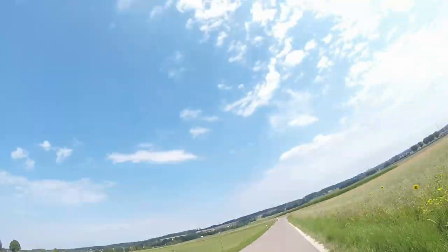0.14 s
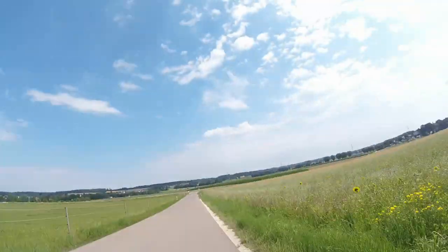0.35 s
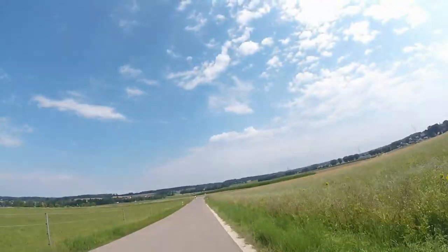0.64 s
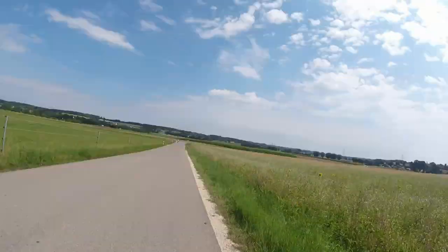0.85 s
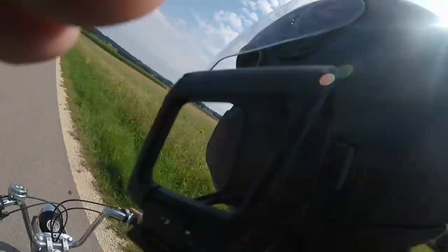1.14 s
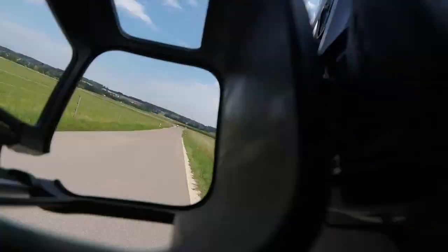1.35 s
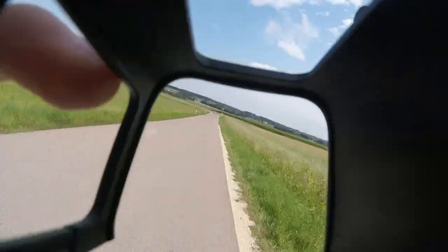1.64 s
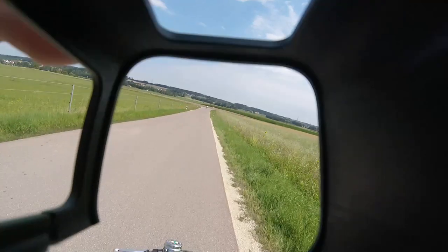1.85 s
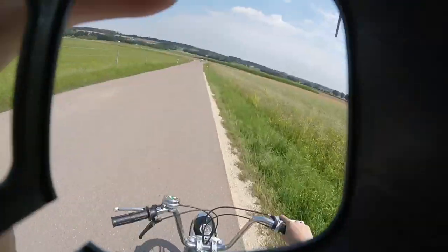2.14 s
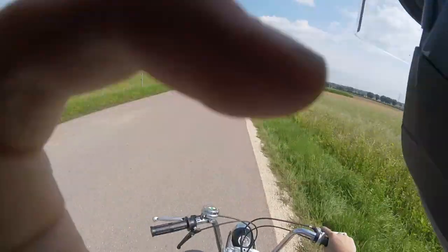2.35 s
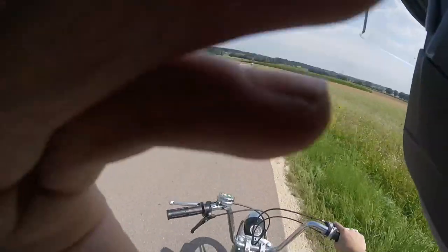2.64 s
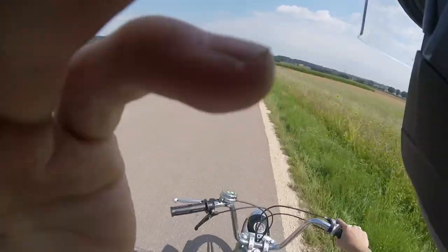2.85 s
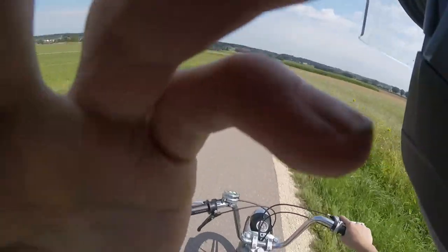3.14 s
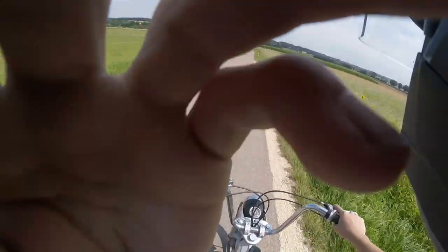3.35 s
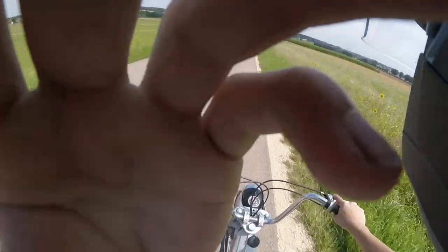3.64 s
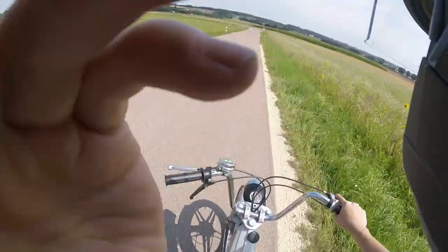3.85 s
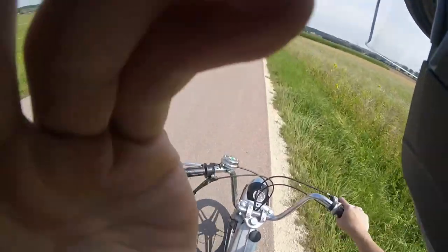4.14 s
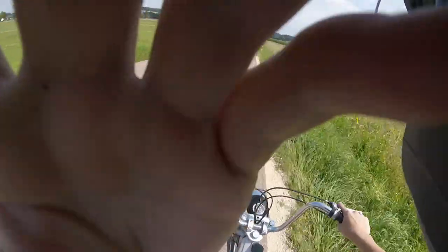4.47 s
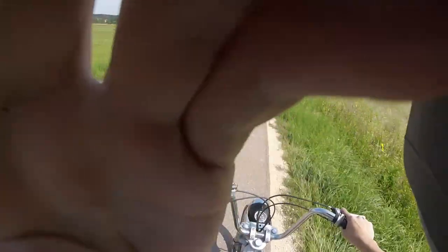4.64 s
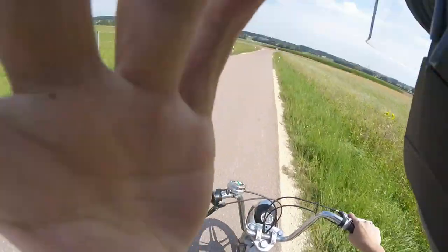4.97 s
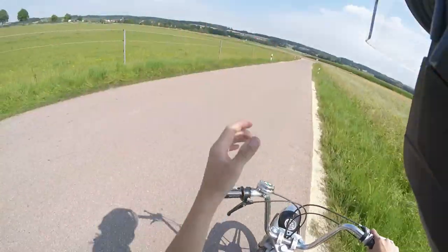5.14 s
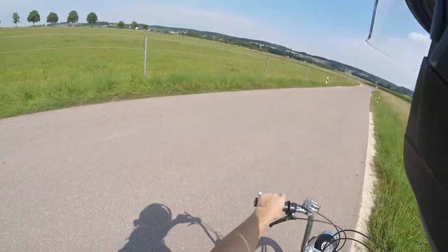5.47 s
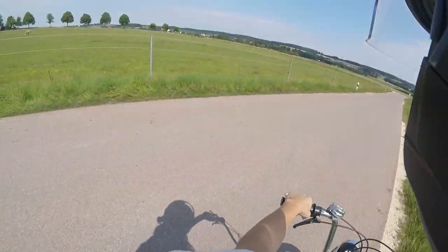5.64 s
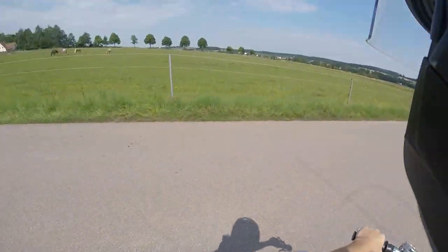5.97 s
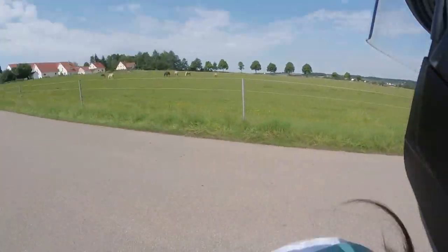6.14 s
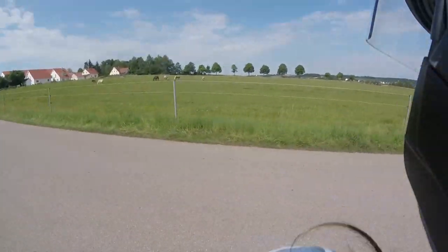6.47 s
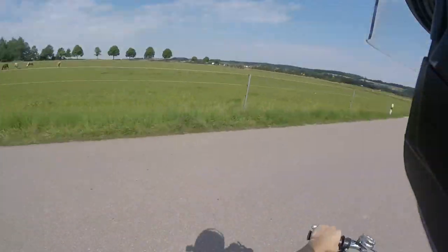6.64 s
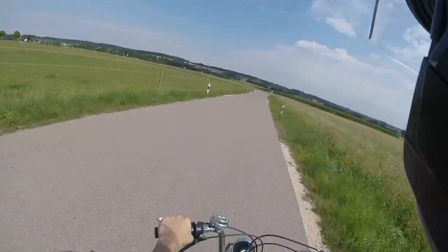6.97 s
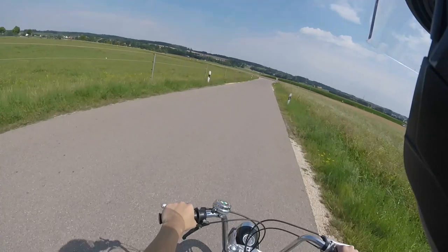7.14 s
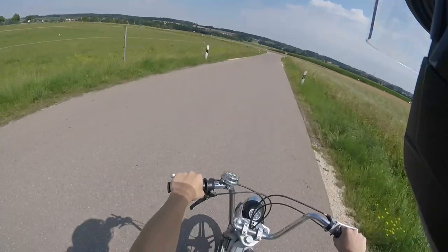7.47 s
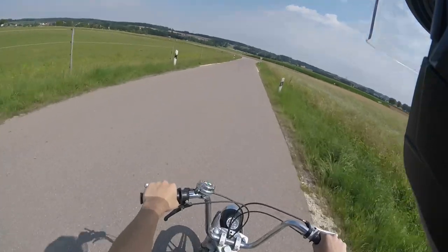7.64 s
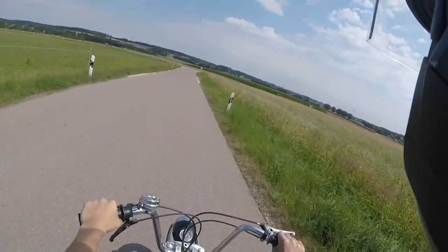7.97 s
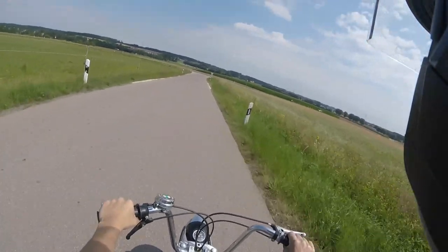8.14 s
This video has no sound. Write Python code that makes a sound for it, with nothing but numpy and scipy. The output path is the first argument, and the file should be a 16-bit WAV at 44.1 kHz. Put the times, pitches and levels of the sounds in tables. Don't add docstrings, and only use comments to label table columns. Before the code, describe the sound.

Outdoors, a small two-stroke moped runs throughout, close to a helmet-mounted microphone: rapid purring pops, hollow intake and silencer resonance, dry metallic fin rattle and light tyre hiss. At 0-1 s it sounds open and steady, with a soft thump at 0.1. From 1.0 s it becomes more muffled as fingers handle the plastic casing: a rub, a longer scrape at 1.3-1.6, small latch clicks at 1.4 and 1.5, and a hard knock at 1.73. A squeaky rub at 2.2 leads to a heavy thud at 2.43. Engine pitch sinks gradually until 4.8, under low, lumpy wind gusts. The loudest snap hits at 4.77; engine and wind dip just before each big knock and swell back. Wind buffets strongly around 5.7-6 and 6.8. Revs rise from 5.1, the rattle thinning around 6-6.7, then accelerate sharply after 7.7, louder and brighter, until the abrupt end at 8.3.

```python
import sys
import numpy as np
from scipy import signal
from scipy.fft import rfft, irfft, next_fast_len
from scipy.io import wavfile
from scipy.ndimage import map_coordinates

SR = 44100
rng = np.random.default_rng(int(sys.argv[2]) if len(sys.argv) > 2 else 0)


def unload_wav(signal):
    wavfile.write(
        sys.argv[1],
        SR,
        np.round(np.clip(np.atleast_2d(signal).T, -1, 1) * 32767).astype(np.int16),
    )


def to_linear_factor(level_db):
    exponent = np.asarray(level_db, float) / 20
    return 10 ** exponent


N = 366471
T = np.arange(N) / SR

# t/s, echo delay/s, echo level/dB, shading/0-1
ROAD = [(0, 0.0022, -2, 0.36), (.95, 0.0023, -1.5, 0.3), (1.1, 0.002, -22, 1), (2.6, 0.0023, -35, 0.84),
        (4.7, 0.0015, -18, 1), (5, 0.0017, -14, 1), (6.7, 0.00161, -11, 1), (7.1, 0.0019, -12, 0.7),
        (7.7, 0.0025, -4.5, 0.93), (8.31, 0.0022, -8.5, 0.63)]


def unit(x):
    return x / np.sqrt(np.mean(x ** 2) + 1e-20)


def along(points, hz):
    f, v = np.transpose(points)
    return np.interp(np.log(hz + 1), np.log(f + 1), v)


def curves(rows):
    s, *columns = np.transpose(rows)
    return [np.interp(T, s, column) for column in columns]


def wobble(rate):
    knots = rng.standard_normal(int(N * rate / SR) + 4)
    return map_coordinates(knots, [T * rate])


def filtered(x, response):
    m = next_fast_len(N + SR // 2)
    spectrum = rfft(x, m) * response(np.fft.rfftfreq(m, 1 / SR))
    return irfft(spectrum, m)[:N]


def hiss(spectrum):
    return unit(filtered(rng.standard_normal(N), lambda hz: to_linear_factor(along(spectrum, hz))))


def resonant(modes, flip=-1):
    def response(f):
        total = 0
        for k, (centre, width, db) in enumerate(modes):
            bandwidth = 1j * f * width
            total = total + flip ** k * to_linear_factor(db) * bandwidth / (centre * centre - f * f + bandwidth)
        return total
    return response


def pulses(turns, scatter_db, jitter, late=0, gain=1):
    whole = np.arange(1, int(turns[-1]) + 1)
    chance = rng.standard_normal((len(whole), 2))
    at = np.interp(whole + jitter * chance[:, 0], turns, np.arange(N) + late * SR).clip(0, N - 1)
    k = at.astype(int)
    size = to_linear_factor(scatter_db * chance[:, 1]) * (gain * np.ones(N))[k]
    before = np.bincount(k, size * (k + 1 - at), N + 1)
    after = np.bincount(k + 1, size * (at - k), N + 1)
    return (before + after)[:N]


def exhaust(turns):
    # f/Hz, width/Hz, level/dB
    pop_open = [(1227, 370, 4), (730, 14, 6), (2320, 1100, -25), (215, 150, 4.5)]
    # f/Hz, width/Hz, level/dB
    pop_shaded = [(1052, 164, 2.5), (728, 95, -0.5), (2340, 530, -12), (202, 420, -11)]
    delay, echo_db, shade = curves(ROAD)
    direct = pulses(turns, scatter_db=0.9, jitter=0.00024)
    echo = pulses(turns, scatter_db=3.5, jitter=0.00066, late=delay, gain=to_linear_factor(echo_db))
    blasts = direct + echo

    def path(modes, top_hz):
        return unit(filtered(blasts, lambda f: resonant(modes, flip=1)(f) / (1 + 1j * f / top_hz) ** 3))

    shade = shade.clip(0, 1)
    return -(1 - shade) * path(pop_open, top_hz=4080) - shade * path(pop_shaded, top_hz=2090)


def chamber(turns, modes):
    puffs = pulses(turns, scatter_db=0.8, jitter=0.0022)
    return unit(filtered(puffs, lambda f: np.conj(resonant(modes, flip=1)(f)) ** 2))


def intake_and_silencer(speed, turns, throttle_db):
    # f/Hz, width/Hz, level/dB
    off_pipe = [(467, 126, 5), (517, 84, -1.5), (680, 130, -12), (802, 78, -10.5), (1532, 140, -2),
                (1980, 170, -6)]
    # f/Hz, width/Hz, level/dB
    on_pipe = [(443, 113, 4), (508, 97, -3.5), (740, 59, -15.5), (1200, 100, -5), (1570, 150, -6),
               (2040, 110, -11)]
    # f/Hz, width/Hz, level/dB
    intake = [(377.4, 74, 0)]
    # t/s, level/dB
    airbox = [(0, -9), (.5, 4), (1, 5), (2.5, 1), (2.9, 4), (3.5, -2), (3.95, -9.5), (4.25, -3), (4.6, 6.5),
              (5.3, 1.5), (5.85, -1.5), (6.2, -22), (7.3, -24), (7.5, 4.5), (7.72, 3.5), (7.8, -1),
              (7.88, -8), (8.2, -4)]
    pipe_from, pipe_span = 78.5, 2.5
    port_turns = turns + 0.12
    tuned = ((speed - pipe_from) / pipe_span).clip(0, 1)
    silencer = (1 - tuned) * chamber(port_turns, off_pipe) + tuned * chamber(port_turns, on_pipe)
    return to_linear_factor(curves(airbox)[0]) * chamber(port_turns, intake) + to_linear_factor(throttle_db - 7.0) * silencer


def shaft_orders(turns):
    # multiple of the shaft rate, level over the pop/dB
    orders = [(1, 4), (2, 3), (3, 0), (4, -6)]
    return sum(to_linear_factor(db + 0.23 * wobble(16)) * np.sin(2 * np.pi * k * turns) for k, db in orders)


def tyres(throttle_db):
    # f/Hz, level/dB per Hz
    tread = [(300, -17), (600, -36), (900, -11), (1570, -12), (2500, -14.5), (4590, -44), (6640, -22),
             (7900, -73)]
    level_db, yield_share = -6.5, 0.39
    return to_linear_factor(level_db - yield_share * throttle_db + 1.16 * wobble(23)) * hiss(tread)


def rattle(turns):
    # t after the firing/s, level/dB, decay/s
    slap_times = [
        (0, -1, .0015),
        (.0042, 1, .002),
        (.0078, -3, .0015),
        (.0115, -9, .0015),
    ]
    # f/Hz, level/dB per Hz
    case = [(700, -3), (1300, 0.5), (2300, -2.5), (3060, 0), (4540, -5), (5400, -2.5), (6000, -5.5),
            (7400, -17)]
    # f/Hz, width/Hz, level/dB
    fins = [(2025, 45, -6), (2887, 14, 1.5), (3197, 25, -6), (3378, 30, -2), (3492, 30, -2), (3621, 35, -3),
            (3749, 35, 1), (3862, 45, -3), (4055, 36, -1), (4330, 40, -8), (4829, 30, -5), (4980, 30, -8),
            (5120, 70, -3), (6450, 130, -5)]
    # f/Hz, width/Hz, level/dB
    barrel_modes = [(3760, 520, 0), (5100, 300, -9), (6450, 220, -14)]
    gate_floor, same_blow = 0.28, 0.14
    fins_db, barrel_db, barrel_hides_db = 6, 0.5, 12.5

    def soften(tau):
        return lambda f: SR / (1 / tau + 2j * np.pi * f) / (1 + 1j * f / 400)

    slaps = [to_linear_factor(db) * pulses(turns, scatter_db=-1.0, jitter=0.0025, late=late) for late, db, _ in slap_times]
    gate = gate_floor + sum(filtered(slap, soften(tau)) for slap, (_, _, tau) in zip(slaps, slap_times))
    struck = unit(gate * rng.standard_normal(N)) + same_blow * unit(sum(slaps))
    body = filtered(struck, lambda f: to_linear_factor(along(case, f)) + to_linear_factor(fins_db) * resonant(fins, flip=1)(f))
    shade = curves(ROAD)[2]
    barrel = to_linear_factor(barrel_db - barrel_hides_db * shade) * filtered(struck, resonant(barrel_modes, flip=0.39))
    return unit(body + barrel)


def engine():
    # t/s, f/Hz
    firing = [(0.0, 62.57), (0.9, 60.85), (1.8, 58.81), (2.7, 56.8), (3.6, 54.09), (4.3, 52.32),
              (4.8, 50.6), (5.1, 51.01), (5.4, 52.19), (6.0, 57.64), (6.3, 59.92), (6.6, 64.15),
              (7.2, 69.95), (7.5, 73.38), (7.7, 76.35), (7.87, 80.22), (8.02, 85.54), (8.31, 94.65)]
    # t/s, exhaust level/dB, throttle/dB, view of the cylinder/dB
    ride = [(0, -33, -1, -1), (.5, -31, 0, 1.5), (.93, -30, 1, 0), (1.06, -34, 0.5, -3),
            (1.66, -33, 11, -2.5), (2.2, -37, 4.5, 1), (2.9, -36, 6.5, 2), (3.8, -32, 7.5, 2.5),
            (4.25, -31, 11.5, 4), (4.7, -31, 4, 7), (5, -33.5, 9, 3.5), (5.4, -34, 7.5, -2),
            (5.85, -30.5, 3, -12), (6.25, -33.5, 9, -11), (6.7, -30, 1.5, -11), (6.9, -31, 11, -2),
            (7.78, -26, 11.5, -1), (7.92, -26.5, 19.5, -1)]
    speed, = curves(firing)
    turns = -0.28 + np.cumsum(speed) / SR
    exhaust_db, throttle_db, view_db = curves(ride)
    mix = to_linear_factor(1.5) * exhaust(turns)
    mix = mix + intake_and_silencer(speed, turns, throttle_db)
    mix = mix + shaft_orders(turns) + tyres(throttle_db)
    mix = mix + to_linear_factor(view_db - 1.2) * rattle(turns)
    return to_linear_factor(exhaust_db) * mix


def wind():
    # t/s, level/dB
    airflow = [(0, -20), (.7, -16), (1.6, -11), (2.4, -25), (4.7, -20.5), (5.3, -19.5), (6.1, -18.5),
               (6.5, -15.5), (7.4, -18.5), (8.31, -21)]
    # peak t/s, strength/dB, half length/s, flutter over its usual share/dB
    gusts = [(0.017, -18.5, 0.053, 2), (0.132, -27, 0.08, 10), (0.74, -18, 0.078, -15),
             (1.122, -17.5, 0.042, 9), (1.287, -22, 0.02, 12), (1.41, -25, 0.046, 11),
             (1.555, -5, 0.046, 2.5), (1.903, -4.5, 0.033, -3), (2.11, -18, 0.021, 5),
             (2.275, -3, 0.027, -12), (2.513, -24, 0.012, 15), (2.716, -19.5, 0.053, -20),
             (2.953, -18, 0.024, -21), (3.427, -10, 0.073, -10), (3.57, -5.5, 0.039, -11),
             (3.66, -15, 0.057, 0.5), (3.798, -4.5, 0.044, -9), (4.198, -7.5, 0.018, 3),
             (4.606, -13.5, 0.22, -3), (5.023, -22, 0.017, 7), (5.35, -15, 0.076, 4.5),
             (5.489, -10, 0.065, -0.5), (5.69, -6.5, 0.16, -6), (5.868, -0.5, 0.051, -6),
             (5.966, -2, 0.034, -7), (6.264, -20, 0.055, 1), (6.592, -8, 0.077, -11),
             (6.77, -2.5, 0.062, 0.5)]
    # f/Hz, level/dB per Hz
    buffet_bands = [(15, -5), (35, 1.5), (60, 1.5), (120, -5.5), (200, -16), (400, -24), (800, -56)]
    # f/Hz, level/dB per Hz
    flutter_bands = [(100, -5.5), (200, 3.5), (320, -3.5), (600, -9.5), (1200, -22.5), (2500, -35.5),
                     (7000, -61)]
    gust_flutter_db, calm_flutter_db = -12.5, -10.5
    breeze = to_linear_factor(curves(airflow)[0])
    push = breeze
    flap = to_linear_factor(calm_flutter_db) * breeze
    for peak, db, half, extra_db in gusts:
        swell = to_linear_factor(db) * np.exp(-((T - peak) / half) ** 2)
        push = push + swell
        flap = flap + to_linear_factor(gust_flutter_db + extra_db) * swell
    lumps = wobble(22)
    buffet = unit(to_linear_factor(1.6 * lumps) * hiss(buffet_bands))
    flutter = unit(to_linear_factor(0.6 * lumps + 3 * wobble(70)) * hiss(flutter_bands))
    return to_linear_factor(-9.5) * push * buffet + to_linear_factor(-3.5) * flap * flutter


def knocks():
    # t/s, peak level/dB, f/Hz, t60/s, crack level/dB
    pushes = [(0.089, -7.5, 126, 0.045, -43), (1.063, -14.5, 710, 0.013, -26),
              (1.549, -23, 600, 0.017, -17), (1.7319, 3, 357, 0.0044, -24), (1.891, -11, 59, 0.13, -44),
              (2.025, -10, 440, 0.011, -31), (2.099, -5, 53, 0.046, -22), (2.271, -6, 86, 0.048, -42),
              (2.382, -7, 300, 0.0061, -31), (2.409, -1.5, 294, 0.016, -28), (2.4253, 11, 98, 0.021, -19),
              (4.7681, -18.5, 2610, 0.022, -17), (4.782, -15, 61.5, 0.1, -50)]
    # t/s, peak level/dB, f/Hz, t60/s, crack level/dB
    pulls = [
        (1.001, -8.5, 39, 0.17, -43),
        (1.706, -16, 503, 0.006, -26),
        (1.7356, 3, 200, 0.0079, -19),
        (2.4252, 0, 307, 0.017, -22),
        (4.77, 13.5, 705, 0.0016, -42),
        (4.7703, 2, 92, 0.015, -12),
        (5.01, -21, 114, 0.026, -47),
    ]
    out = np.zeros(N + SR)
    t = np.arange(SR // 4) / SR
    for sign, s, db, hz, t60, crack_db in [(1, *k) for k in pushes] + [(-1, *k) for k in pulls]:
        push = sign * to_linear_factor(db + 1.5 - 60 * t / t60) * np.sin(2 * np.pi * hz * t)
        crack = to_linear_factor(crack_db + 9.0 - 60 * t / 0.01) * rng.standard_normal(len(t))
        out[round(s * SR):][:len(t)] += push + signal.lfilter([0.2], [1, -0.8], crack)
    return out[:N]


def scrapes():
    # start t/s, end t/s, level/dB, swell power, squeak level/dB
    drags = [
        (1.056, 1.164, -25, 0.073, -23),
        (1.328, 1.605, -25.5, 0.15, -33),
        (1.8, 1.86, -38, .1, -26),
        (2.202, 2.268, -25.5, 1.2, 0.5),
    ]
    # f/Hz, level/dB per Hz
    skin_bands = [(200, 2), (600, 12.5), (1300, 5.5), (2500, -6), (5000, -14), (7900, -20)]
    # f/Hz, level/dB per Hz
    squeak_bands = [(800, 7), (2000, -8), (5000, -2), (7000, -4.5), (8000, -6)]
    skin = unit(to_linear_factor(4.0 * wobble(90)) * hiss(skin_bands))
    squeak = hiss(squeak_bands)
    out = np.zeros(N)
    for start, end, db, power, squeak_db in drags:
        swell = np.clip((T - start) / (end - start), 0, 1) ** power * (T < end)
        out += to_linear_factor(db) * swell * (skin + to_linear_factor(squeak_db) * squeak)
    return out


def latch():
    # t/s, level/dB
    clicks = [
        (1.402, -19),
        (1.481, -16),
        (1.687, -33),
    ]
    # f/Hz, width/Hz, level/dB
    latch_mode = [(4350, 700, 0)]
    ticks = np.zeros(N)
    for s, db in clicks:
        ticks[round(s * SR)] = to_linear_factor(db + 22.5)
    return filtered(ticks, resonant(latch_mode))


def ducking():
    # loud knock t/s, depth/dB, recovery/s
    ducks = [
        (1.7316, 19, 0.28),
        (2.425, 13, 0.27),
        (4.772, 26.5, 0.26),
    ]
    ahead_s, lag_db, settle_s = 0.052, 9, 0.089
    drop_db = np.zeros(N)
    for s, db, recovery in ducks:
        start = s - ahead_s
        since = np.abs(T - start)
        drop_db += (T > start) * (db * np.exp(-since / recovery) - lag_db * np.exp(-since / settle_s))
    return to_linear_factor(-drop_db)


def scene():
    handling = knocks() + scrapes() + latch()
    return (ducking() * (engine() + wind()) + handling)[None]


def top_cut(x):
    return signal.sosfilt(signal.butter(12, 16570, fs=SR, output="sos"), x)


def record(dry):
    # f/Hz, level/dB
    mirror = [(8000, -2.5), (9500, -12.5), (12300, -17), (15000, -26.5), (15900, -44)]
    camera_hz, image_top_hz, ceiling = 16000, 15830, 0.85
    half = camera_hz / 2
    held = dry[0] / (1 + np.abs(dry[0] / ceiling) ** 6) ** (1 / 6)
    base = filtered(held, lambda hz: (hz < half) * hz / (hz + 8))
    folded = 2 * base * np.cos(2 * np.pi * camera_hz * T)
    image = filtered(folded, lambda hz: (hz > half) * (hz < image_top_hz) * to_linear_factor(along(mirror, hz)))
    return top_cut((base + image)[None])


dry = scene()
out = record(dry)
unload_wav(out)
```